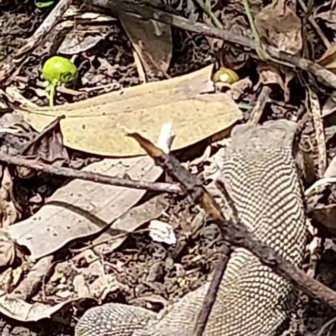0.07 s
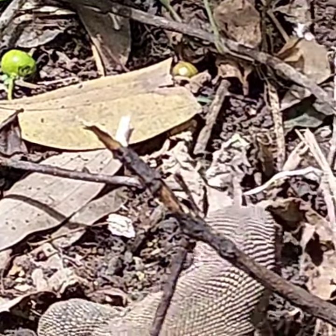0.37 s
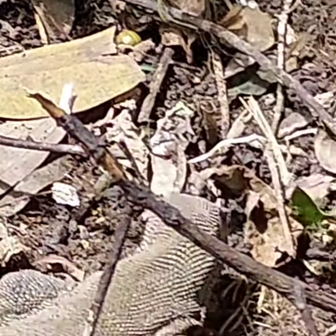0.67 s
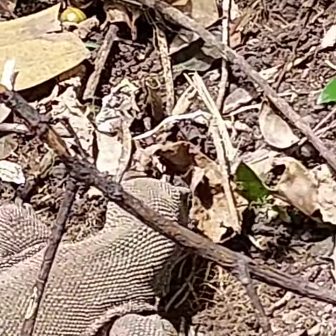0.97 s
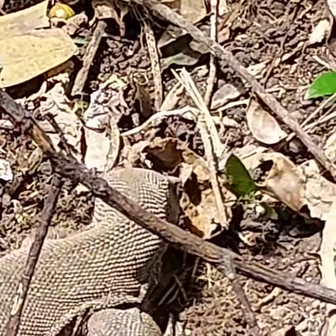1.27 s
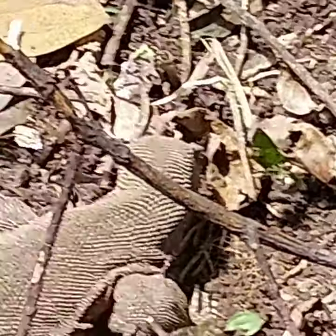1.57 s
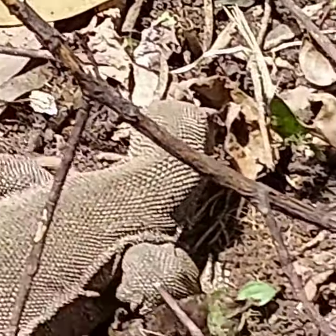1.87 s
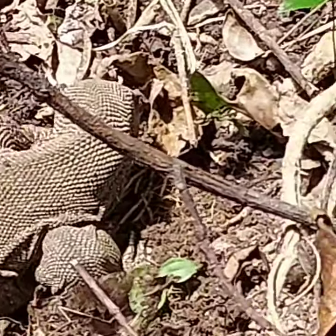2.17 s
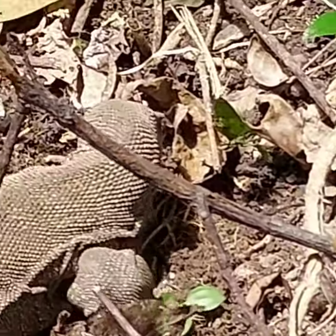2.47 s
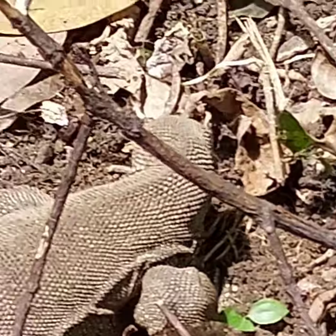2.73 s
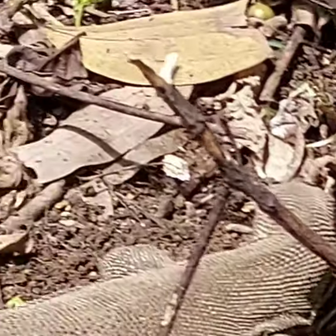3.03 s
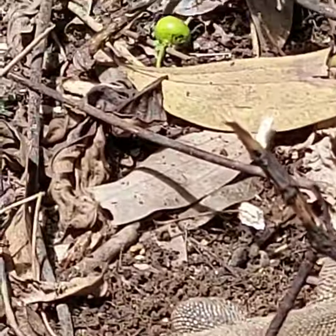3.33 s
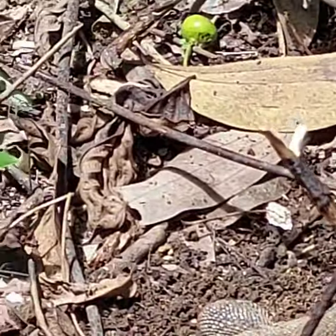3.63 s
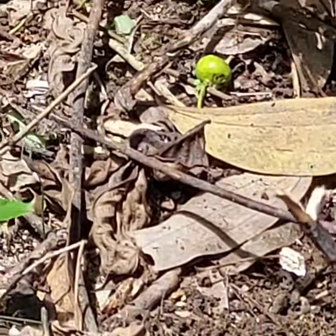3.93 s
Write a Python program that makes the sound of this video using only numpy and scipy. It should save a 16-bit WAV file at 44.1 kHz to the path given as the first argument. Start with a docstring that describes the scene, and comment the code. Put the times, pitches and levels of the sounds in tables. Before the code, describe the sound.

A continuous high insect drone, with soft crackles of a lizard moving over leaves and soil.

```python
"""Insects drone all around the microphone, several kinds, each in its own band.
Close by, a lizard shifts through dry leaves and soil: crackling scrapes, leaf snaps, soft steps
and one low scuff of its belly. Off among the trees a small bird gives one thin falling call.
Underneath lies a low rumble with a wavering hum, like far traffic."""
import sys
import numpy as np
from scipy import signal
from scipy.fft import rfft, irfft, next_fast_len
from scipy.io import wavfile
from scipy.ndimage import map_coordinates

SR = 44100
rng = np.random.default_rng(int(sys.argv[2]) if len(sys.argv) > 2 else 0)


def file_out(sig):
    """Save sig as 16-bit WAV at sys.argv[1]."""
    # one column per channel
    cols = np.atleast_2d(sig).T
    # limit, then scale
    lim = np.clip(cols, -1, 1)
    pcm = np.round(lim * 32767).astype(np.int16)
    wavfile.write(sys.argv[1], SR, pcm)


N = 176400
TOP_HZ = 15830
# Low sounds reach both sides nearly alike. Each row: frequency in Hz, left-right likeness from 0 to 1.
LOW_ALIKE = [(130, .97), (800, 0.79)]


def scrapes(soil_share=0.38):
    """Near the microphone, each push of the lizard's body sets off tiny leaf cracks over sliding soil."""
    # Each row: peak, rise and fall in seconds, level in dB, treble tilt in dB per octave.
    pushes = [(.91, 0.032, 0.03, -47, 2.5), (0.969, 0.053, 0.061, -46.5, -1), (1.255, 0.12, 0.1, -53, 0),
              (1.422, .025, 0.022, -49, 1), (1.976, 0.026, 0.025, -49.5, 0.5),
              (2.063, 0.039, 0.04, -47.5, -1.5), (2.15, 0.05, 0.12, -55, -1.5),
              (2.311, 0.017, 0.025, -47.5, -5.5), (2.37, 0.016, 0.15, -57, -7),
              (3.04, 0.063, 0.05, -56.5, -7.5), (3.6, 1, 1, -61.5, -8.5), (3.957, 0.056, 0.15, -51, -4.5)]
    # Colour of the leaves. Each row: frequency in Hz, relative level in dB.
    leaves = [(200, -4), (1300, -8.5), (2000, -4), (3600, -1), (5000, 1.5), (9000, 2.5), (16000, -1.5)]
    t, out = clock(), np.zeros((2, N))
    litter = grit() + soil_share * rng.standard_normal((2, N))
    for s, rise, fall, db, tilt_db in pushes:
        near = (t > s - 4 * rise) & (t < s + 4 * fall)
        age = t[near] - s
        push = np.exp(-np.abs(age / np.where(age < 0, rise, fall)) ** 1.25)
        colour = lambda hz: amp(along(leaves, hz) + tilt_db * np.log2(np.maximum(hz / 1500, 1)))
        out[:, near] += amp(db) * push * unit(filtered(litter[:, near], colour))
    return out


def grit(band_cracks_per_s=1200, spread_db=2):
    """Dense tiny cracks in six bands, each crack in the register of its own leaf fragment."""
    out = np.zeros((2, N))
    edges = np.linspace(0, np.sqrt(TOP_HZ), 7) ** 2
    for lo, hi in zip(edges[:-1], edges[1:]):
        sizes = amp(spread_db * np.minimum(rng.exponential(size=N), 4))
        cracks = sizes * (rng.random(N) < band_cracks_per_s / SR)
        band = lambda hz: 1 / np.sqrt(1 + ((2 * hz - lo - hi) / (hi - lo)) ** 6)
        out += filtered(cracks * rng.standard_normal((2, N)), band)
    return unit(out)


def crunch(start_s=0.9648, fall_s=0.012, db=-38.5, ring_hz=5340, octaves=0.17):
    """A curled leaf gives way: a burst of tiny cracks through its resonance."""
    age = clock() - start_s
    ring = lambda hz: np.exp(-(np.log2((hz + 1) / ring_hz) / octaves) ** 2 / 2)
    burst = (age > 0) * np.exp(-np.abs(age) / fall_s)
    return amp(db) * burst * unit(filtered(grit(), ring))


def snaps(decay_s=0.00038, tail_db=-18, tail_s=0.0065):
    """Dry leaves and twigs break close by: a millisecond of crack, then a short rattle of litter."""
    # Each row: start in seconds, level in dB, band centre in Hz, left over right in dB.
    breaks = [(.951, -40, 5200, -4), (0.9653, -33, 6000, 0), (.9706, -37, 1990, 2), (1.262, -33, 6500, 1),
              (1.956, -26.5, 11200, -9.5), (2.07, -47, 3020, 6), (2.101, -35.5, 8000, -5),
              (2.1547, -31.5, 2200, 3.5), (2.1537, -31.5, 8100, -9), (2.2987, -32, 11000, -7),
              (2.3016, -40.5, 4600, -7), (2.3088, -30.5, 10000, -7), (2.3092, -39, 1800, 1),
              (2.317, -41, 4500, -12), (2.363, -34, 9000, -9), (2.3943, -38.5, 4130, 6),
              (2.456, -44, 5500, 11), (2.995, -37.5, 3180, -3), (3.021, -38.5, 3200, -3),
              (3.383, -40.5, 2400, 0), (3.464, -38, 1480, 2), (3.629, -46, 3820, -11),
              (3.9183, -34.5, 5000, -8), (3.9538, -25, 8060, -5), (3.955, -31, 2550, -3),
              (3.9668, -30, 2350, 0)]
    # Stiff dry leaves ring near 2 kHz. Each row: frequency in Hz, gain in dB.
    leaf_ring = [(1000, -14), (1500, 3.5), (2100, 1.5), (3400, -3)]
    out, age = np.zeros((2, N)), np.arange(2048) / SR
    fall = np.exp(-age / decay_s) + amp(tail_db) * np.exp(-age / tail_s)
    for s, db, centre_hz, pan_db in breaks:
        octaves = 0.56 * (centre_hz / 2000) ** 0.89  # higher, sharper cracks spread wider
        band = lambda hz: np.exp(-(np.log2((hz + 1) / centre_hz) / octaves) ** 2)
        colour = lambda hz: amp(along(leaf_ring, hz)) * band(hz)
        attack = 1 - np.exp(-age * centre_hz * 2)
        crack = filtered(rng.standard_normal((2, len(age))), colour) * fall * attack
        crack /= np.sqrt(np.sum(crack ** 2, axis=1, keepdims=True) / (decay_s * SR))
        add(out, s, amp(db) * panned(pan_db) * crack)
    return out


def steps():
    """Footfalls as quickly damped knocks: a woody one on a twig, then duller ones on soil."""
    # Each row: start in seconds, level in dB, pitch in Hz, decay in seconds.
    footfalls = [(3.0372, -19.5, 2250, 0.00076), (3.463, -20, 172, 0.0034), (3.9662, -23, 730, 0.001),
                 (3.967, -37.5, 468, 0.01)]
    out, age = np.zeros((2, N)), np.arange(SR // 10) / SR
    for s, db, hz, decay in footfalls:
        attack = 1 - np.exp(-np.pi * hz * age)
        knock = np.sin(2 * np.pi * hz * age) * np.exp(-age / decay) * attack
        add(out, s, amp(db) * panned(0) * knock)
    return out


def belly_drag(scuff_s=2.544, scuff_hz=274.5, scuff_db=-50.5):
    """A soft, low scuff close by as the lizard drags its belly."""
    band = [(scuff_hz / 2, -50), (scuff_hz * 0.81, 0), (scuff_hz * 1.16, -2), (scuff_hz * 2, -50)]
    return amp(scuff_db) * panned(0.85) * swell(scuff_s, half=0.11) * rush(band, LOW_ALIKE)


def insects():
    """All around the microphone: two soft trills, a broad chorus, a piercing whine and a sizzle."""
    # One spectrum for each kind. Each row: frequency in Hz, relative level in dB.
    low_trill = [(2550, -29.5), (3000, -10.5), (3105, 2.5), (3200, -2.5), (3700, -26.5)]
    mid_trill = [(5300, -23.5), (5950, -2.5), (6200, 4), (6750, -22)]
    chorus = [(6200, -50), (6700, -7), (7000, 2.5), (7200, 3), (7950, -1), (8700, -18), (9150, -17),
              (9600, -10.5), (9950, -25), (10400, -33)]
    whine = [(11200, -44), (12100, -15), (12390, -4), (12800, -19), (13900, -32)]
    sizzle = [(12900, -47), (14250, 3), (15000, 0), (15800, -6)]
    # The whine sinks and recovers. Each row: time in seconds, base level in dB.
    whine_level = [(.32, -51), (.43, -54.5), (2.57, -52), (2.7, -56.5), (3.1, -52), (3.55, -56.5),
                   (3.95, -50)]
    # One low-trilling insect calls louder. Each row: centre and half length in seconds, rise in dB.
    surges = [(.21, .045, 3), (1.8, .03, 4), (2.97, .012, 5), (3.16, .03, 7)]
    whine_db, = curves(whine_level)
    surge_db = sum(db * swell(s, half) for s, half, db in surges)
    return (swarm(low_trill, surge_db - 63, pan_db=-0.5, drift=(1, 24), flutter=(-1.5, 110))
            + swarm(mid_trill, -64.5, pan_db=-2.5, drift=(-0.8, 4.5), flutter=(1, 170))
            + swarm(chorus, -53, pan_db=1.3, drift=(0.7, 9), flutter=(1, 130))
            + swarm(whine, whine_db + 1, pan_db=2.5, drift=(1, 14), flutter=(0.1, 110))
            + swarm(sizzle, -53, pan_db=2, drift=(0.5, 14), flutter=(2.1, 63)))


def swarm(spectrum, db, pan_db, drift, flutter):
    """Insects of one kind blur into a band; drift and flutter each give depth in dB, knots a second."""
    (drift_db, drift_rate), (flutter_db, flutter_rate) = drift, flutter
    wander = wobble(drift_rate) + np.array([wobble(drift_rate), wobble(drift_rate)]) / 2
    drone = rush(spectrum) * amp(drift_db * wander + flutter_db * wobble(flutter_rate))
    return amp(db) * panned(pan_db) * unit(drone)


def bird(fade_s=0.004, echo_db=2.5, trees_t60_s=0.35):
    """One falling whistle, a little to the left, scattered by trunks and foliage."""
    # Each row: time in seconds, pitch in Hz, level in dB.
    whistle = [(.795, 9980, -42), (.809, 9820, -40.5), (.85, 8520, -38), (.878, 7490, -40.5),
               (.911, 7020, -40), (.919, 7400, -64)]
    hz, db = curves(whistle)
    t = clock()
    fade = np.clip(np.minimum(t - whistle[0][0], whistle[-1][0] - t) / fade_s, 0, 1)
    call = amp(db) * fade * tone(hz + 25 * wobble(280))
    age = t[:SR // 2]
    trees = rng.standard_normal((2, len(age))) * amp(-60 * age / trees_t60_s)
    echo = signal.fftconvolve(call[None], trees / np.linalg.norm(trees[0]), axes=1)[:, :N]
    return panned(2.3) * (call + amp(echo_db) * echo)


def far_rumble():
    """In the distance, like traffic: a low rumble and wavering hum tones."""
    # Swells of the hum. Each row: centre and half length in seconds, pitch in Hz, level in dB.
    hums = [(0.51, 0.21, 75, -49), (2.79, 0.52, 76, -49), (1.87, 1.01, 128, -49.5),
            (1.346, 0.17, 214, -50.5), (2.05, 0.14, 213, -54)]
    # Each row: frequency in Hz, relative level in dB.
    spectrum = [(22, -35), (52, -4), (75, -5), (135, 0), (165, -9), (250, -13.5), (350, -23), (700, -31),
                (1500, -64)]
    hum = sum(amp(db) * swell(s, half) * np.sqrt(2) * tone(hz + 1.61 * wobble(9))
              for s, half, hz, db in hums)
    return panned(0.85) * (hum + amp(-45.5) * rush(spectrum, LOW_ALIKE))


def air(db=-61):
    """Faint moving air, spread wide behind everything."""
    # Each row: frequency in Hz, relative level in dB.
    spectrum = [(150, -22), (400, -2.5), (850, 0.5), (1400, -8.5), (1700, -5.5), (2100, -15), (2600, -13),
                (4000, -22), (16000, -49)]
    # Each row: frequency in Hz, left-right likeness from 0 to 1.
    alike = [(200, 0.14), (600, 0.39), (1100, 0.055)]
    return amp(db + 0.18 * wobble(9.3)) * rush(spectrum, alike)


def amp(db):
    return 10 ** (np.asarray(db) / 20)


def unit(x):
    return x / np.sqrt(np.mean(x ** 2) + 1e-20)


def clock():
    return np.arange(N) / SR


def tone(hz):
    """A sine that follows a pitch curve."""
    return np.sin(2 * np.pi * np.cumsum(hz) / SR)


def along(points, hz):
    """Interpolate (Hz, value) points on a log axis."""
    f, v = np.transpose(points)
    return np.interp(np.log(hz + 1), np.log(f + 1), v)


def curves(rows):
    """One value per sample for each column after the time."""
    s, *cols = np.transpose(rows)
    return [np.interp(clock(), s, c) for c in cols]


def wobble(rate):
    """A smooth random curve, rate knots a second."""
    return map_coordinates(rng.standard_normal(2048), [clock() * rate + 2], mode="wrap")


def swell(s, half):
    """A smooth rise and fall around time s."""
    return np.exp(-((clock() - s) / half) ** 2 / 2)


def filtered(x, response):
    """Shape x by a gain that depends on frequency."""
    n = x.shape[-1]
    m = next_fast_len(n + 4096)
    return irfft(rfft(x, m) * response(np.fft.rfftfreq(m, 1 / SR)), m)[..., :n]


def panned(pan_db):
    """Left and right gains; positive leans left."""
    return amp([[pan_db / 2], [-pan_db / 2]])


def rush(spectrum, alike=((1, 0),)):
    """Stereo noise of rms 1 with a given colour and left-right likeness."""
    turn = lambda hz: np.arccos(np.clip(along(alike, hz), -1, 1)) / 2
    gains = lambda hz: amp(along(spectrum, hz)) * [np.cos(turn(hz)), np.sin(turn(hz))]
    mid, side = filtered(rng.standard_normal((2, N)), gains)
    return unit(np.array([mid + side, mid - side]))


def add(track, s, sound, right_lead_s=0.0003):
    """Lay a stereo sound on the track; it reaches the right of the microphone first."""
    for channel, start in enumerate((s + right_lead_s / 2, s - right_lead_s / 2)):
        part = track[channel, round(start * SR):][:sound.shape[1]]
        part += sound[channel, :len(part)]


def scene():
    return (insects() + far_rumble() + belly_drag() + air() + bird()
            + scrapes() + crunch() + snaps() + steps())


def record(dry):
    """The recorder keeps nothing above its band limit."""
    return filtered(dry, lambda hz: hz < TOP_HZ)


dry = scene()
out = record(dry)
file_out(out)
```